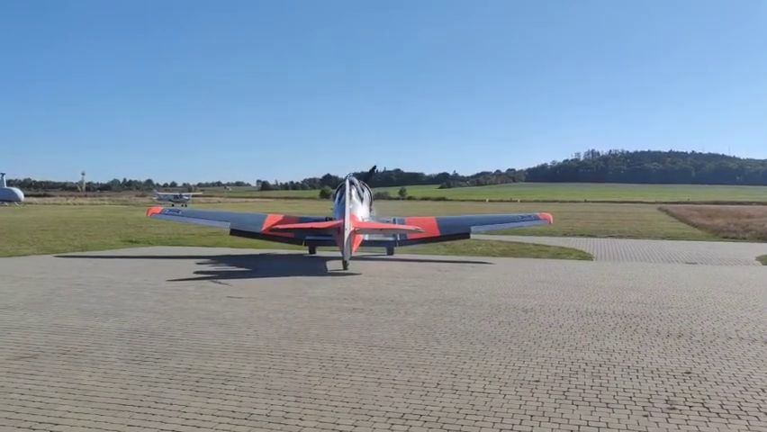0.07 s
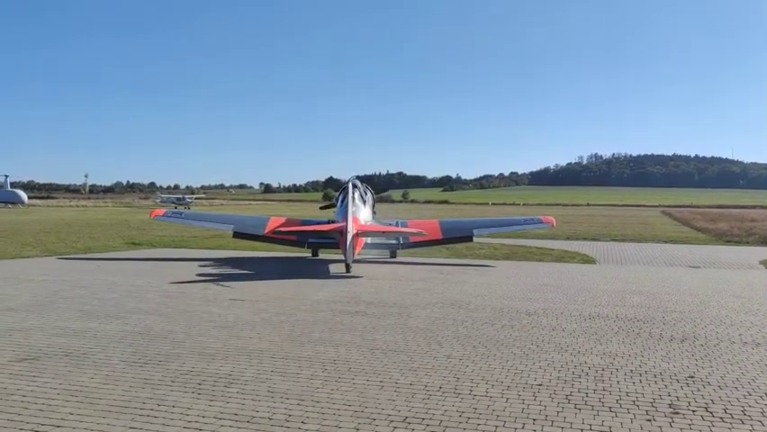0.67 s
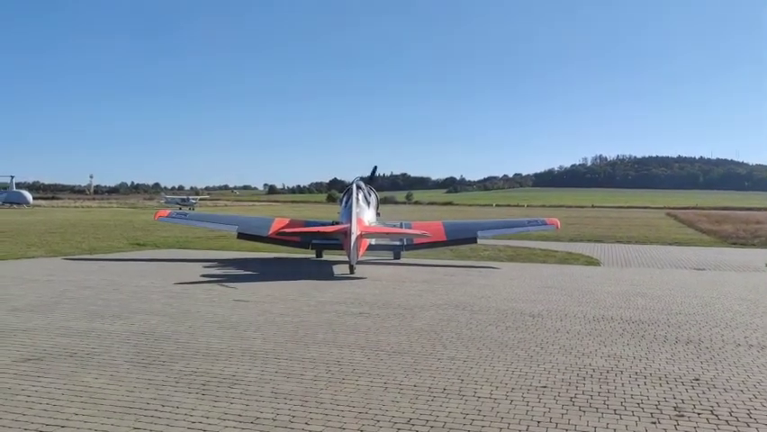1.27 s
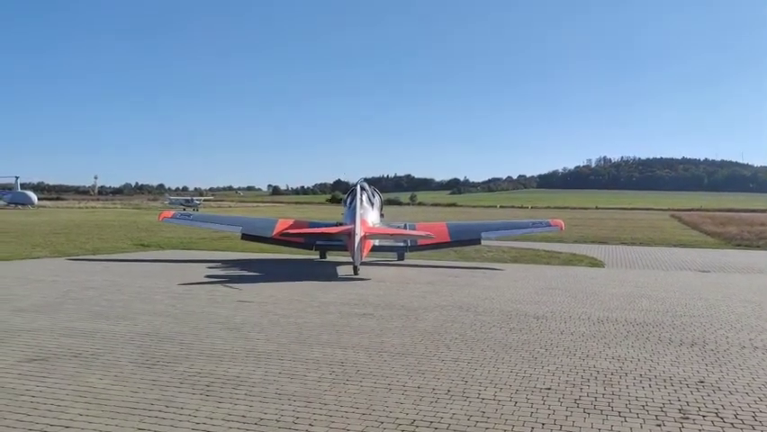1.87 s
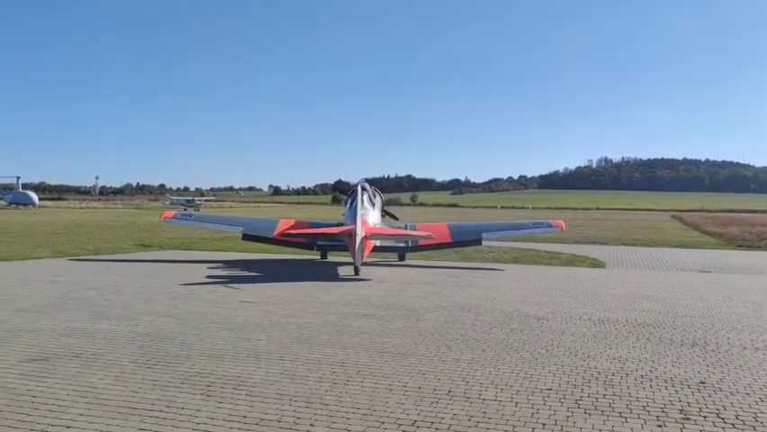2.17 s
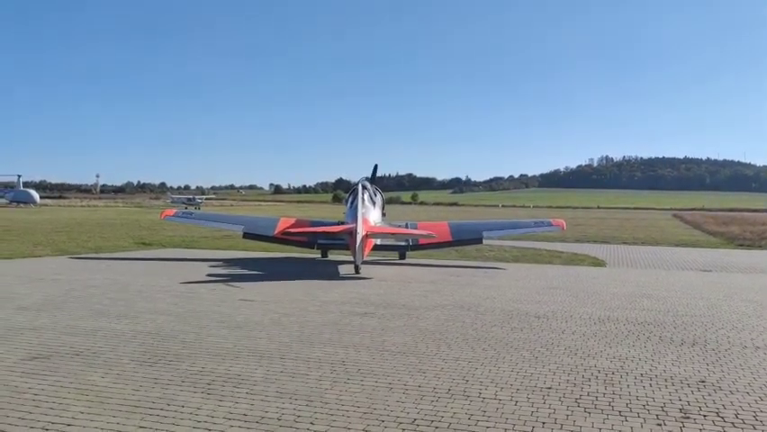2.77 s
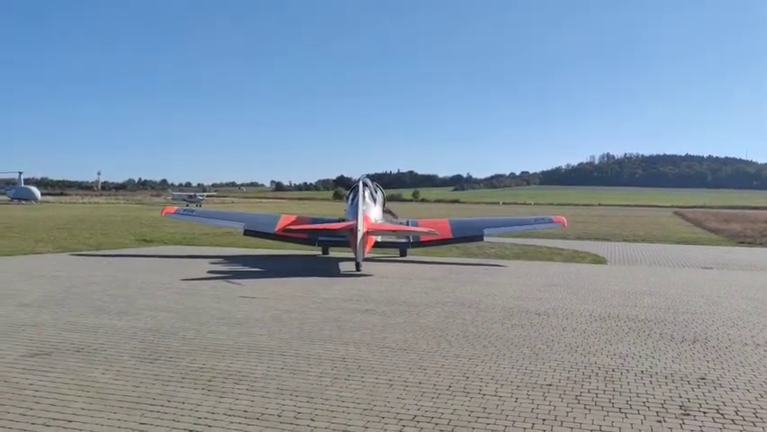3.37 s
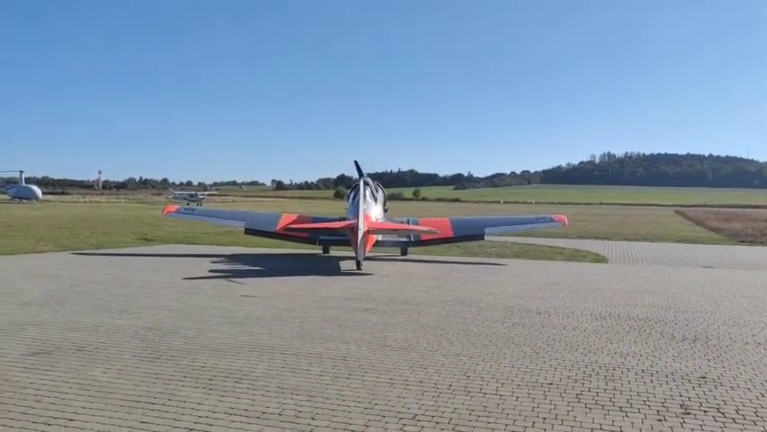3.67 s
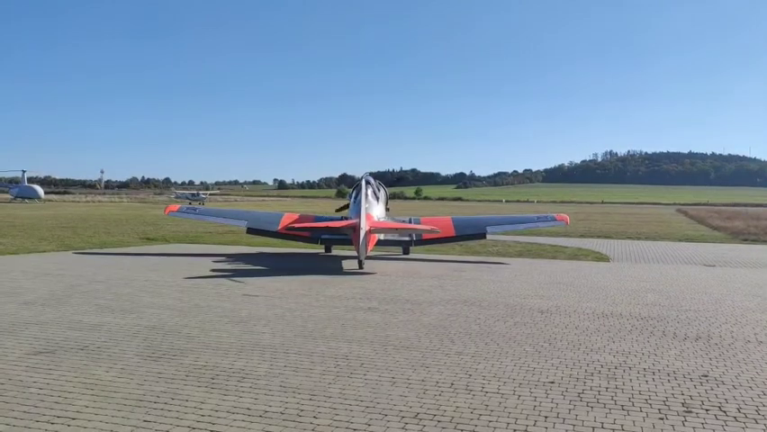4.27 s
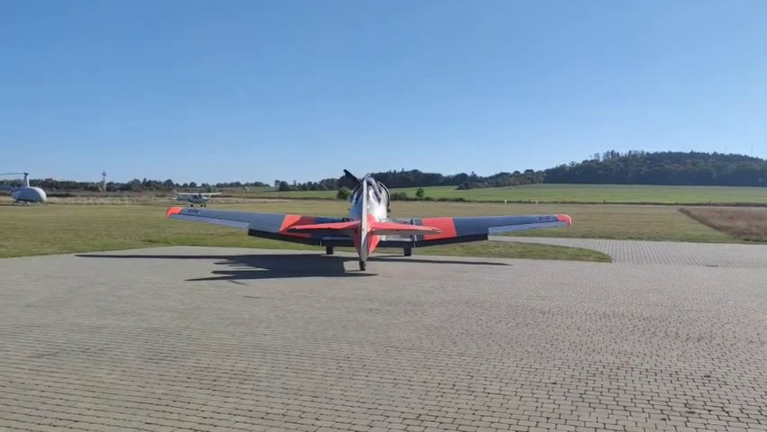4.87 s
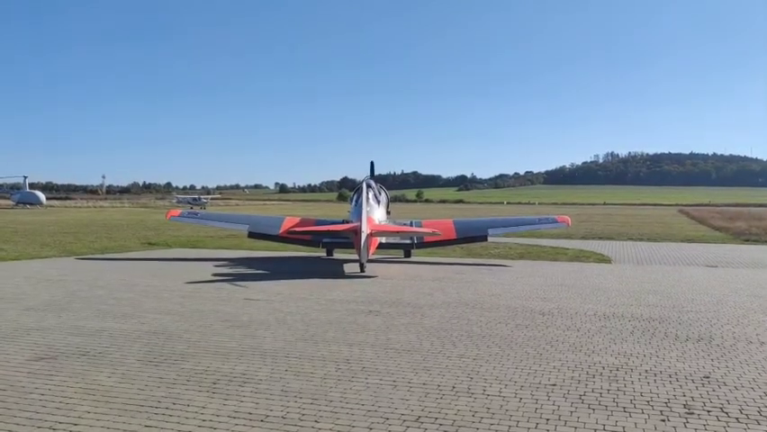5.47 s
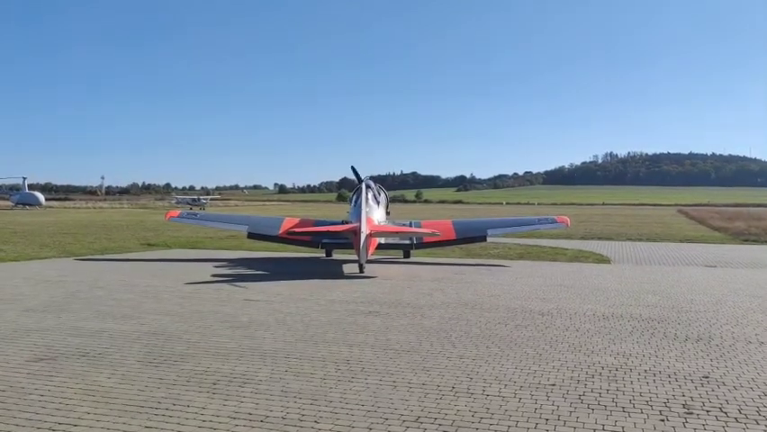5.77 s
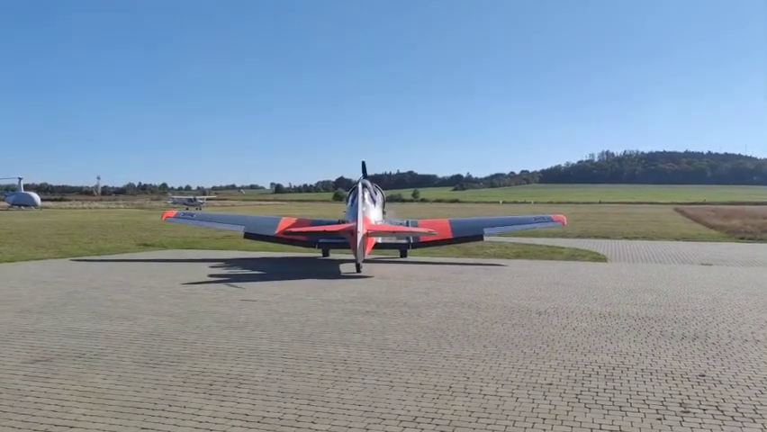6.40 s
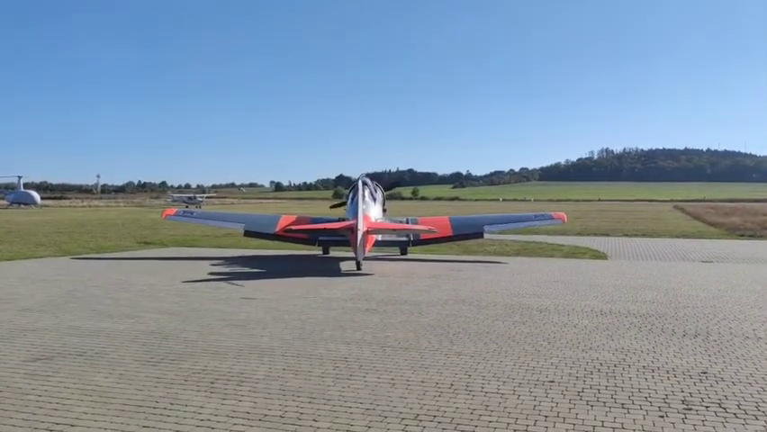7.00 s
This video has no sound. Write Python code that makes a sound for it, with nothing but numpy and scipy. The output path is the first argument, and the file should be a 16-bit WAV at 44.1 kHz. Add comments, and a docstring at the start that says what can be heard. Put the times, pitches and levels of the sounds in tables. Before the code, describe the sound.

A propeller plane's piston engine catches five times in sputtering, hissing bursts and dies each time, as wind buffets the microphone.

```python
"""A small plane tries to start

A piston engine, heard from behind on an open airfield, catches five times and dies away each time.
Each firing is a puff of exhaust, a hiss with a low thump, over the roar of the turning engine.
Wind fades at the start, then returns and buffets the microphone's two openings (ports) separately."""
import sys
import numpy as np
from scipy import signal
from scipy.fft import rfft, irfft
from scipy.io import wavfile
from scipy.ndimage import uniform_filter1d

SR = 44100
rng = np.random.default_rng(int(sys.argv[2]) if len(sys.argv) > 2 else 0)


def persist_wave(psi):
    """Save psi, clipped to +-1, as 16-bit WAV."""
    counts = np.round(np.clip(psi, -1, 1) * 32767).astype(np.int16)
    wavfile.write(sys.argv[1], SR, np.atleast_2d(counts).T)


N = 310464
TIME, FREQS = np.arange(N) / SR, np.fft.rfftfreq(N, 1 / SR)


def amp(db):
    """Turns decibels into a factor to multiply by."""
    return 10 ** (np.asarray(db) / 20)


def unit(x):
    """Scales a signal to an average size (rms) of one."""
    return x / np.sqrt(np.mean(x ** 2) + 1e-20)


def read(points, column=1):
    """Joins a table's points into a curve over all frequencies, on a log axis."""
    table = np.array(points, float)
    return np.interp(np.log(FREQS + 1), np.log(table[:, 0] + 1), table[:, column])


def add(mix, s, sound):
    """Lays a sound into the mix, starting at s seconds."""
    part = mix[max(round(s * SR), 0):][:len(sound)]
    part += sound[:len(part)]


def flutter(rate_hz):
    """Random wavering, up to about the given rate."""
    return unit(irfft(rfft(rng.standard_normal(N)) / (1 + (FREQS / rate_hz) ** 4), N))


# tone of the open air: f/Hz, level/dB
HUSH = [(20, 9), (150, -38), (400, -1), (1000, -9), (2500, -35.5), (5000, -20), (7800, -79), (10000, -51),
        (16000, -46)]

def airfield():
    """The faint hush of the open airfield."""
    return amp(-61.0) * unit(irfft(rfft(rng.standard_normal((2, N))) * amp(read(HUSH)), N))


# tone of wind on a port: f/Hz, level/dB
WIND_TONE = [(5, -14), (20, 2.5), (42, 1), (80, 0.5), (160, -4.5), (300, -11.5), (500, -21.5), (800, -31),
             (1200, -46.5), (2000, -64), (4000, -81.5)]

def turbulence(level_db, eddy_hz, eddy_db, brighten):
    """Wind on one port: the faster an eddy (a swirl of air) passes, the higher its noise reaches."""
    noise = rfft(unit(irfft(rfft(rng.standard_normal(N)) * amp(read(WIND_TONE)), N)))
    # large eddies carry small ones
    eddies = 2.01 * np.tanh((flutter(eddy_hz) + 0.74 * flutter(3.8 * eddy_hz)) / 2.2)
    tilt_db = eddy_db * eddies + brighten * (level_db + 19.5)
    octave = np.clip(np.log2((FREQS + 1) / 75), 0, 4)
    out = np.zeros(N)
    for k in range(5):
        band = irfft(noise * np.maximum(1 - abs(octave - k), 0), N)
        out += band * amp(level_db + k * tilt_db)
    return out


def port_colour(x, hz, brightness_hz):
    """Keeps the frequencies that an eddy of this size stirs up in a port."""
    colour = hz ** 2 / (hz ** 2 + 230 ** 2) / (1 + (hz / (1.52 * brightness_hz)) ** 4.4)
    return irfft(rfft(x) * colour / (1 + (hz / 3800) ** 6), len(x))


def chance_eddies(wind_db, brightness_hz, peak_per_s=36):
    """Lesser eddies come at random: more of them, and harder, in stronger wind."""
    step = SR // 60
    slots, rows = np.arange(0, N, step), []
    chances, spreads = rng.random((len(slots), 2)), rng.uniform(-0.87, 1, (len(slots), 3))
    for at, (luck, port), (size, pitch, length) in zip(slots, chances, spreads):
        if luck < peak_per_s * amp(wind_db[at] - wind_db.max()) ** 2 * step / SR:
            db = wind_db[at] - 4 + 2.5 * size
            rows.append((at / SR, port, db, 0.0077 * 2 ** length, brightness_hz[at] * 2 ** (0.43 * pitch)))
    return rows


# the hardest eddies: t/s, port (0 left, 1 right), level/dB, rough length/s, brightness/Hz
HARD_EDDIES = [(2.66, 0, -27.5, 0.023, 346), (2.803, 0, -23.5, .005, 546), (2.979, 1, -22.5, 0.0074, 243),
               (3.014, 1, -20, 0.0089, 292), (3.251, 0, -17.5, 0.013, 380), (3.43, 1, -19.5, 0.018, 323),
               (4.023, 1, -13, 0.012, 223), (4.267, 0, -18, 0.0097, 350), (4.417, 1, -19.5, 0.0093, 362),
               (4.452, 0, -14, 0.0046, 340), (4.541, 1, -16, 0.0067, 367), (4.602, 0, -14.5, 0.0074, 330),
               (4.633, 1, -18.5, 0.01, 640), (4.665, 1, -13.5, 0.012, 496), (4.708, 1, -17, 0.027, 625),
               (4.796, 1, -11, 0.0024, 624), (4.858, 1, -16.5, 0.0064, 880), (5.32, 1, -18.5, 0.011, 716),
               (5.541, 1, -14.5, 0.01, 414), (5.611, 1, -17.5, 0.0056, 650), (5.669, 1, -22.5, 0.0069, 870),
               (5.767, 0, -19, 0.016, 420), (6.005, 1, -15.5, 0.0081, 523), (6.14, 0, -22.5, 0.02, 390),
               (6.172, 1, -26.5, 0.018, 700), (6.191, 1, -29.5, 0.0019, 2480), (6.305, 0, -13, 0.0066, 550),
               (6.324, 1, -21, .0067, 835), (6.374, 0, -21, 0.012, 690), (6.455, 1, -19, 0.022, 600),
               (6.499, 0, -15.5, 0.008, 450), (6.576, 0, -17.5, 0.0069, 450), (6.63, 1, -18.5, 0.0065, 520)]

def buffets(lesser_eddies):
    """Each eddy hits one port as a ragged burst and sheds a few small pops around it."""
    eddies = HARD_EDDIES + lesser_eddies
    t, out = np.arange(SR // 8) / SR, np.zeros((2, N))
    hz, from_middle = np.fft.rfftfreq(len(t), 1 / SR), t - t.mean()
    for s, port, db, length, brightness_hz in eddies:
        noise, grain, luck = rng.standard_normal((3, len(t)))
        ragged = amp(3.5 * unit(uniform_filter1d(grain, size=130)))
        swell = np.exp(-(from_middle / (0.74 * length)) ** 2)
        burst = unit(port_colour(noise * ragged, hz, brightness_hz) * swell) * np.sqrt(np.mean(swell ** 2))
        strikes = (luck > 2.7) * np.sign(noise) * np.exp(-(from_middle / .04) ** 2)
        pops = port_colour(strikes, hz, 1.02 * brightness_hz)
        pops /= abs(pops).max() + 1e-12
        add(out[int(round(port))], s - t.mean(), amp(db) * (amp(1.1) * burst + amp(-5.0) * pops))
    return out


# how the wind rises and falls: t/s, strength/dB, brightness of its eddies/Hz
GUSTS = [(0, -27, 150), (.16, -32.5, 150), (.4, -50, 150), (2.55, -63, 220), (2.62, -23, 280),
         (3.1, -24, 230), (3.27, -23, 258), (3.6, -31, 220), (3.9, -26.5, 220), (3.98, -20.5, 230),
         (4.5, -22, 300), (4.68, -21, 603), (5.05, -22, 263), (5.4, -20.5, 372), (5.7, -23, 420),
         (6.0, -20, 420), (6.4, -21, 590), (6.8, -22.5, 250)]
# brief dips in the wind noise: t/s, half length/s, depth/dB
WIND_DIPS = [(3.176, 0.032, 12), (4.756, 0.04, 6.5), (6.058, 0.037, 14.5)]

def wind():
    """Each port feels its own lumps in the wind, with sharp buffets on top."""
    times, *columns = np.transpose(GUSTS)
    wind_db, brightness_hz = [np.interp(TIME, times, column) for column in columns]
    ports = [turbulence(wind_db + 2.27 * flutter(15.7), eddy_hz=48, eddy_db=2.0, brighten=0.48)
             for _ in range(2)]
    hits = buffets(chance_eddies(wind_db, brightness_hz))
    dip_db = sum(db * np.exp(-((TIME - s) / half) ** 4) for s, half, db in WIND_DIPS)
    return (amp(3.0) * np.array(ports) + hits) * amp(-dip_db)


# where the exhaust pipes ring: f/Hz, width/Hz, level/dB
PIPE_NOTES = [(665, 58, -0.5), (1190, 270, 3), (1845, 16, 4.5), (2140, 42, 1.5), (2850, 38, 5),
              (3470, 53, 4), (5040, 79, 6), (7900, 110, 4)]
# echoes off the paving and the plane: left delay/s, right delay/s, level/dB
REFLECTIONS = [(.00112, .00131, -15), (.00235, .00205, -49), (.0049, 0.0064, -16.5), (0.0139, 0.018, -9.5)]
# tone of the two ports: f/Hz, left level/dB, right level/dB
PORT_TONE = [(300.0, -4, -3.5), (910, -2.5, -2), (1340, -1.5, 4.5), (2200.0, -1, 4.5), (3430, 2, 3.5),
             (4330, 5.5, 7.5), (5170, 2, 0), (6300, 5.5, 7), (7700, 13, 12.5), (8140, 13.5, -21),
             (8720, 4.5, 1), (10230, -6.5, -10), (13250, -7, 5.5), (15800, -15, -8.5)]

def exhaust_path():
    """How the trip from the exhaust to each port colours the sound."""
    pipes_db = sum(db / (1 + (2 * (FREQS - hz) / width) ** 2) for hz, width, db in PIPE_NOTES)
    echoes = sum(amp(db) * np.exp(-2j * np.pi * np.outer([left, right], FREQS))
                 for left, right, db in REFLECTIONS)
    # long waves pass by, short ones scatter
    reflected = FREQS ** 2 / (FREQS ** 2 + 700 ** 2) / (1 + (FREQS / 7000) ** 2)
    ports_db = np.array([read(PORT_TONE), read(PORT_TONE, column=2)])
    arrival = np.exp(-2j * np.pi * np.outer([0, .00002], FREQS))  # the left port hears it first
    return amp(pipes_db + ports_db) * (1 + reflected * echoes) * arrival


EXHAUST_PATH = exhaust_path()
# how alike the engine sounds left and right: f/Hz, likeness (0 to 1)
STEREO_LIKENESS = [(30, .998), (250, 0.97), (600, 0.71), (1100, 0.48), (3000, 0.37), (7000, 0.27),
                   (8200, 0.09), (15000, 0.085)]

def engine_noise(tone):
    """Swirling gas heard at both ports: alike in the bass, different in the treble."""
    left, other = rfft(rng.standard_normal((2, N)))
    same = np.clip(read(STEREO_LIKENESS), -1, 1)
    right = same * left + np.sqrt(1 - same ** 2) * other
    return unit(irfft(np.array([left, right]) * EXHAUST_PATH * amp(read(tone)), N))


def patchy(x, patches_db):
    """Eddies in the gas favour ever new pitches, each for a few hundredths of a second."""
    slices = signal.stft(x, nperseg=512)[2]
    patches = uniform_filter1d(rng.standard_normal(slices.shape[1:]), size=4, axis=0)
    patches = unit(uniform_filter1d(patches, size=5, axis=1))
    return unit(signal.istft(slices * amp(patches_db * patches), nperseg=512)[1][:, :N])


# five runs of the engine and two short coughs: catch t/s, cut t/s, hiss swell time/s, hiss swell/dB,
# hiss level/dB, roar level/dB, sag/(dB per s), hiss level in the lull before/dB
ENGINE_RUNS = [(0.39, 1.596, 0.085, 10.5, -35, -33.5, 10.5, -61),
               (1.747, 2.526, 0.095, 6.5, -39, -37, 5.5, -61),
               (3.246, 3.96, 0.14, 7.5, -34.5, -33, 5.5, -62), (4.096, 4.1, 0.018, -3, -38, -44.5, 3, -73),
               (4.868, 5.573, 0.068, 17.5, -38, -39, 5.5, -67.5),
               (5.656, 5.74, 0.024, 5, -43.5, -40, 12, -71),
               (6.431, 7.039, 0.14, 22, -37.5, -34, -3.5, -68)]

def run_levels(catch_s=0.0067, roar_lag=1.79, hiss_fall_db_per_s=71, roar_fall_db_per_s=40.5):
    """Roar and hiss in dB: each run catches, swells and dies. The roar lags, with the propeller."""
    catches, lulls = np.transpose(ENGINE_RUNS)[[0, -1]]
    hiss_power = amp(np.interp(TIME, catches, lulls)) ** 2
    roar_power = hiss_power * amp(8) ** 2
    for catch, cut, swell_s, swell_db, hiss_db, roar_db, sag, _ in ENGINE_RUNS:
        age, coasting = np.maximum(TIME - catch, 0), np.maximum(TIME - cut, 0)
        on, sag_db = np.minimum(age / catch_s, 1), sag * (age - coasting)
        hiss_rise_db = -swell_db * np.exp(-age / swell_s)
        roar_rise_db = -roar_lag * swell_db * np.exp(-age / (roar_lag * swell_s))
        hiss_power += on * amp(hiss_db + hiss_rise_db - sag_db - hiss_fall_db_per_s * coasting) ** 2
        roar_power += on * amp(roar_db + roar_rise_db - sag_db - roar_fall_db_per_s * coasting) ** 2
    return 10 * np.log10(roar_power), 10 * np.log10(hiss_power)


# tones of the engine's rumble, roar and hiss: f/Hz, level/dB
RUMBLE_TONE = [(12, -15), (25, 8.5), (45, 7), (70, -0.5), (95, 0), (145, 2), (210, -3), (300, -9),
               (400, -10), (500, -18.5), (660, -14), (900, -27), (1500, -86)]
ROAR_TONE = [(200, 0.5), (600, 5.5), (1000, -0.5), (1400, 0), (1850, -1.5), (2300, -4), (2800, -11.5),
             (4000, -18.5), (8000, -55)]
HISS_TONE = [(1200, 7), (2500, 3), (3400, 3), (4400, -2), (5500, 1.5), (7500, -0.5), (10000, 4.5),
             (13000, -8), (16000, -8)]

def rush(roar_db, hiss_db):
    """A low rumble, a roar and a hiss swell together while the engine turns."""
    rumble = engine_noise(RUMBLE_TONE) * amp(0.86 * roar_db + 7.5 + 1.16 * flutter(31))
    roar = patchy(engine_noise(ROAR_TONE), patches_db=2.5) * amp(roar_db + 1.1 + 2.1 * flutter(50))
    hiss = patchy(engine_noise(HISS_TONE), patches_db=3.5) * amp(hiss_db - 4.0 + 0.86 * flutter(120))
    return rumble + roar + hiss


# brief rasps in the engine noise: middle t/s, rough length/s, f/Hz, width/Hz, level/dB
RASPS = [(0.553, 0.061, 377, 30, -36.5), (0.895, 0.014, 5670, 1600, -33.5), (.965, 0.012, 4500, 2000, -35),
         (1.45, 0.014, 3440, 900, -38), (2.043, 0.044, 398, 25, -30), (3.65, 0.038, 3330, 1500, -34),
         (3.643, 0.062, 1790, 550, -32), (3.729, 0.029, 1760, 220, -33), (3.901, 0.088, 1740, 770, -32),
         (6.933, 0.082, 3270, 1300, -32.5)]

def rasps():
    """Noise gathers around one pitch for a moment and chatters unevenly, louder on the right."""
    t, out = np.arange(SR // 2) / SR, np.zeros((2, N))
    hz = np.fft.rfftfreq(len(t), 1 / SR)
    for s, length, pitch_hz, width_hz, db in RASPS:
        shared, *own = rng.standard_normal((3, len(t)))
        spectrum = rfft(shared + pitch_hz / 4000 * np.array(own))
        noise = irfft(spectrum / (1 + (2 * (hz - pitch_hz) / width_hz) ** 4), len(t))
        swell = np.exp(-(1.14 * (t - t.mean()) / length) ** 2)
        sound = unit(noise * swell) * np.sqrt(np.mean(swell ** 2))
        for channel, part, side_db in zip(out, sound, (-3, 1)):
            add(channel, s - t.mean(), amp(db + side_db) * part)
    return out * unit(amp(4 * flutter(rate_hz=70)))


# volleys, where one or a few cylinders fire in a row: t/s, number of puffs, hiss level/dB,
# high fizz compared with the hiss/dB, thump level/dB, rise from puff to puff/dB
CYLINDER_VOLLEYS = [(.38, 1, -44, 2.5, -35, 0), (0.452, 1, -42.5, 0, -33, 0), (.501, 1, -36, -4.5, -27, 0),
                    (.675, 2, -38.5, -1, -22.5, 1), (.763, 3, -38, -4.5, -20, 0),
                    (.876, 2, -36.5, -6, -19.5, 0.5), (.959, 3, -35, -8, -21, 0.5),
                    (1.068, 2, -45, -5, -18, 7.5), (1.155, 3, -41, -4, -18.5, 3.5),
                    (1.289, 1, -47, -3, -20, 0), (1.389, 1, -43, -3, -43, 0),
                    (1.437, 2, -39, -5, -25, -3.5), (1.532, 1, -38, -0.5, -31, 0),
                    (1.773, 1, -39, -8, -30, 0), (1.963, 2, -42, -3, -22, 6), (2.033, 4, -33, -7, -21.5, 2),
                    (2.142, 3, -38, -8, -20, 1.5), (2.254, 3, -38, -4.5, -18.5, 2),
                    (2.38, 1, -38, -8, -17.5, 0), (2.452, 3, -40, -10, -25, 2),
                    (3.258, 2, -38.5, -7, -23.5, 0), (3.414, 2, -34.5, -1, -31, 4),
                    (3.536, 4, -36, -4, -29, 0.5), (3.644, 1, -24.5, -6, -19, 0),
                    (3.69, 3, -32.5, -6.5, -18.5, 0.5), (3.774, 3, -35.5, -7, -24, -3),
                    (3.855, 4, -38, -2, -25, -0.5), (4.074, 2, -43, -10.5, -32, 3),
                    (4.36, 1, -50, -5, -36, 4), (4.857, 1, -49.5, -2, -15.5, 0),
                    (5.135, 1, -45.5, 5, -29, 0), (5.187, 4, -45.5, -4, -24, 0.5),
                    (5.461, 4, -45, -1, -29, 0.5), (5.661, 1, -42, -9, -11.5, 0),
                    (5.712, 1, -51, -3, -38, 0), (6.498, 1, -51, -4, -20, 0), (6.61, 1, -41, -7, -23, 0),
                    (6.761, 2, -39, -6, -21.5, 0), (6.908, 2, -36.5, -2.5, -22, -4),
                    (7.01, 1, -34.5, 1, -42, 0)]

def firings(rush_db, gap_s=.021, clear_s=.028, stray_share=.6, spread_db=6):
    """Lists each firing (t/s, hiss/dB, fizz/dB, thump/dB): the volleys, and weak strays between them."""
    rows = []
    for s, number, hiss_db, fizz_db, thump_db, rise_db in CYLINDER_VOLLEYS:
        for k in range(round(number)):
            build_db = rise_db * (k - (round(number) - 1) / 2)
            rows.append((s + k * gap_s, hiss_db + build_db, fizz_db, thump_db + build_db))
    taken, slots = np.array(rows)[:, 0], np.arange(0, TIME[-1] - gap_s, gap_s)
    for s, (luck, late, *spread) in zip(slots, rng.uniform(-1, 1, (N // 400, 5))):
        running = any(catch < s < cut for catch, cut, *_ in ENGINE_RUNS)
        if running and abs(luck) < stray_share and abs(taken - s).min() > clear_s:
            db = rush_db[round(s * SR)]
            levels_db = np.array([db - 4.5, -5, db + 6.5]) + spread_db * np.array(spread)
            rows.append((s + 0.18 * gap_s * late, *levels_db))
    return rows


def thumps(fired, swing_hz=52.0, swing_s=0.015, lag_s=0.0066, knock_db=-0.5):
    """Each puff swings the pressure down and back at the exhaust's low note, and knocks in the pipe."""
    t, swing, knock = np.arange(SR // 10) / SR, np.zeros(N), np.zeros(N)
    from_middle = t - t.mean()
    wave = -np.cos(2 * np.pi * swing_hz * from_middle) * np.exp(-(from_middle / swing_s) ** 2)
    opening = np.sin(np.pi / 2 * np.minimum(t / .003, 1)) ** 2 * (1 - t / t[-1])
    for s, _, _, thump_db in fired:
        add(swing, s + lag_s - t.mean(), amp(thump_db) * wave)
        add(knock, s, amp(thump_db) * opening * np.exp(-t / 0.013))
    return amp(1.5) * swing + amp(knock_db) * knock * engine_noise(RUMBLE_TONE)


def puff_shape(t, hold_s, tail_db, rise_s=0.0011, tail_s=0.02):
    """Loudness of one puff over time: the valve opens, the gas escapes, a weaker scatter follows."""
    opening = 1 - np.exp(-(t / rise_s) ** 2)
    return opening * (np.exp(-(t / hold_s) ** 4) + amp(tail_db) * np.exp(-t / tail_s))


# tone of the escaping gas: f/Hz, level/dB
PUFF_TONE = [(200, 7), (700, 13.5), (1500, 11), (3000, 8.5), (5000, 5.5), (7000, 8), (9000, 0), (13000, -8),
             (16000, -5)]

def puffs(fired):
    """Each puff of exhaust is a burst of crackling hiss with its own tint and a high fizz on top."""
    t, out = np.arange(SR // 5) / SR, np.zeros((2, N))
    hz = np.fft.rfftfreq(len(t), 1 / SR)
    hiss_shape = puff_shape(t, hold_s=0.014, tail_db=-1.5)
    fizz_shape = puff_shape(t, hold_s=0.012, tail_db=-2.5)
    gas = np.tile(engine_noise(PUFF_TONE) * amp(0.47 * flutter(1200)), 2)
    treble = 1 - 1 / (1 + (hz / 9200) ** 16)
    for (s, hiss_db, fizz_db, _), shifts in zip(fired, rng.random((N // 400, 3))):
        tint_db = sum(2.1 * np.sin(2 * np.pi * (hz / span_hz + shift))
                      for span_hz, shift in zip([900, 2100, 5200], shifts))
        noise = rfft(gas[:, round(s * SR):][:, :len(t)]) * amp(tint_db)
        hiss = amp(hiss_db - 2.3) * hiss_shape * unit(irfft(noise * (1 - treble), len(t)))
        fizz = amp(hiss_db + fizz_db - 5.0) * fizz_shape * unit(irfft(noise * treble, len(t)))
        for channel, sound in zip(out, hiss + fizz):
            add(channel, s, sound)
    return out


def scene():
    """The engine ahead, the quiet airfield around, and wind at the microphone."""
    roar_db, hiss_db = run_levels()
    fired = firings(hiss_db)
    engine = rush(roar_db, hiss_db) + rasps() + thumps(fired)
    return engine + airfield() + puffs(fired) + wind()


def record(dry):
    """The microphone thins the deepest bass and rounds off the strongest gusts; the top treble is cut."""
    ceiling, top_hz = 0.58, 15750
    thinned = irfft(rfft(dry) * (1 - 0.24 / (1 + (FREQS / 31) ** 6)), N)
    rounded = thinned / (1 + (thinned / ceiling) ** 6) ** (1 / 6)
    treble_cut = signal.firwin(511, top_hz, window=("kaiser", 9), fs=SR)
    return signal.oaconvolve(rounded, treble_cut[None], "same")


dry = scene()
out = record(dry)
persist_wave(out)
```